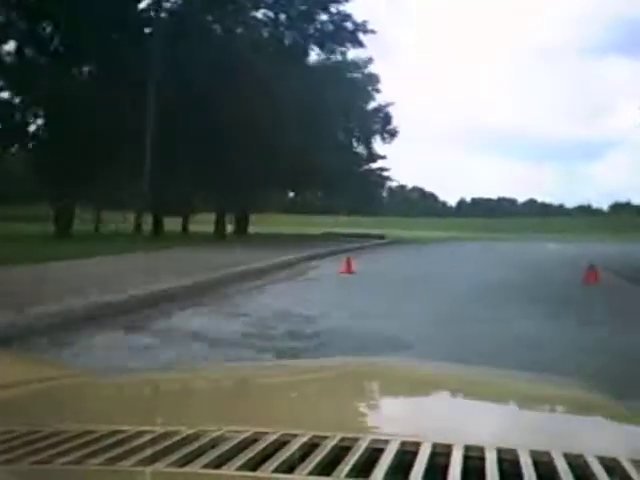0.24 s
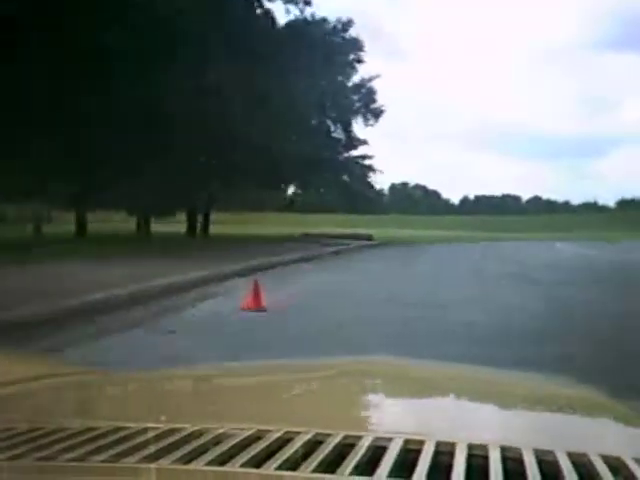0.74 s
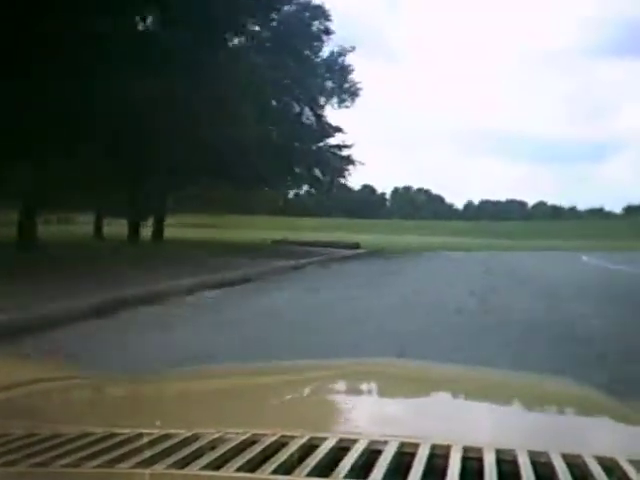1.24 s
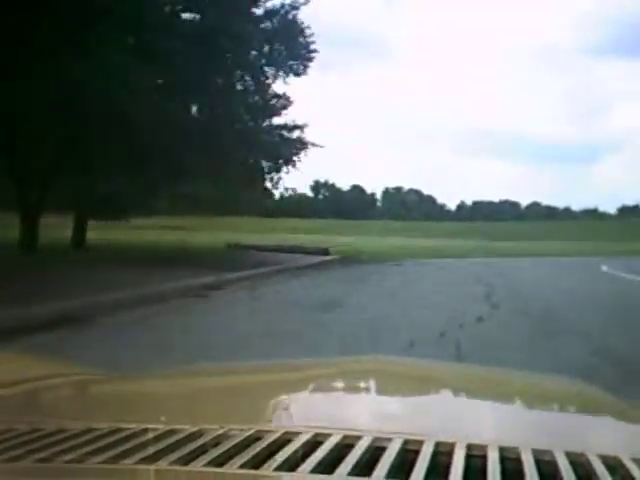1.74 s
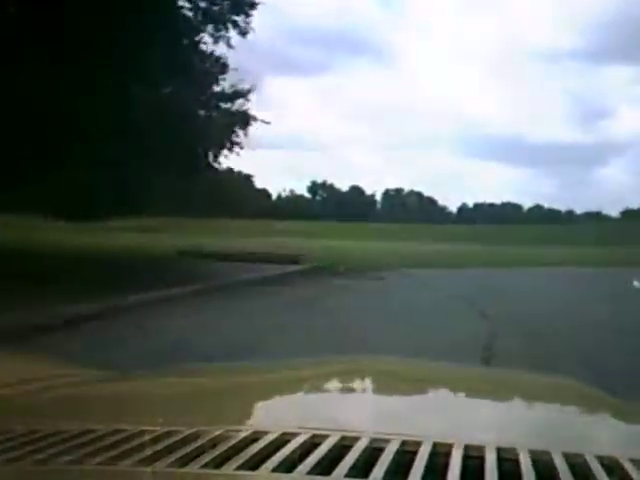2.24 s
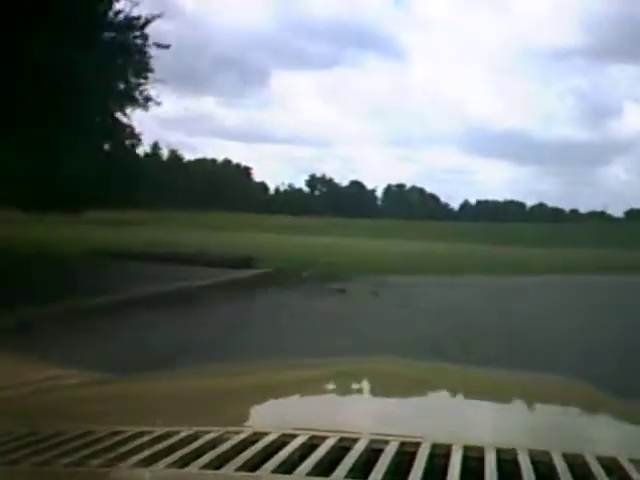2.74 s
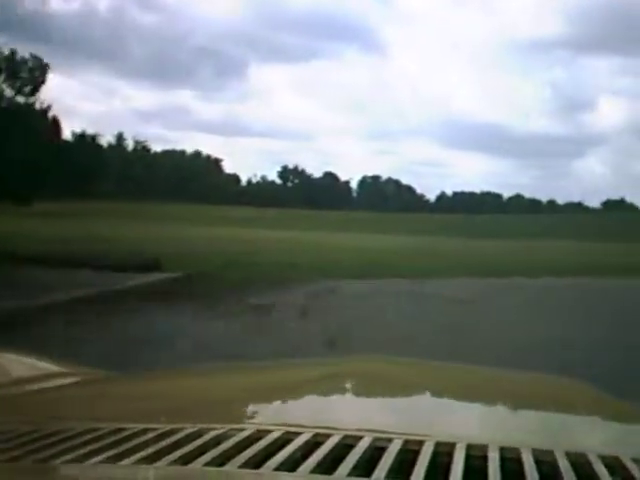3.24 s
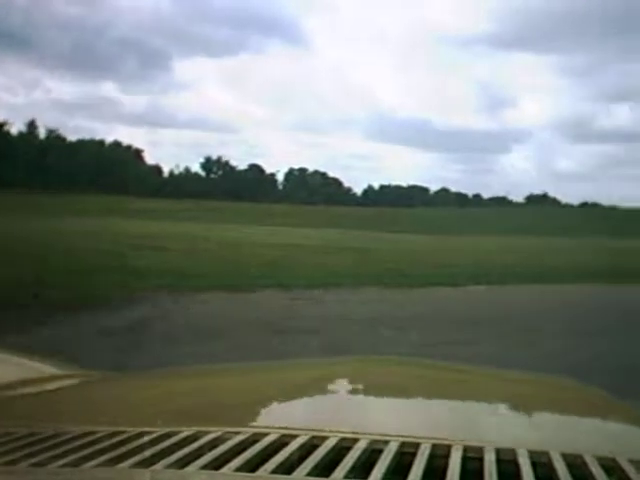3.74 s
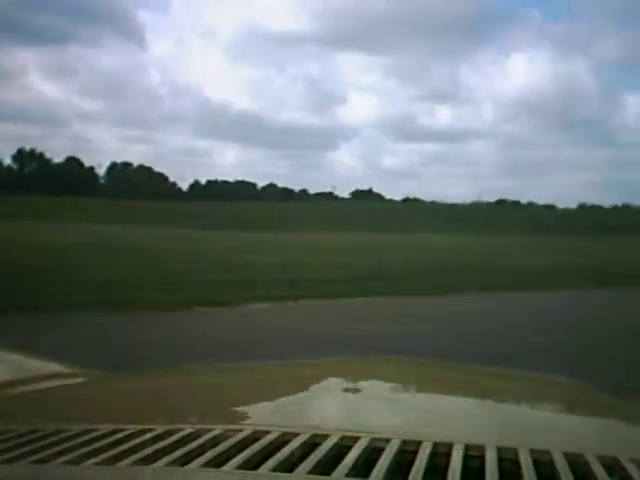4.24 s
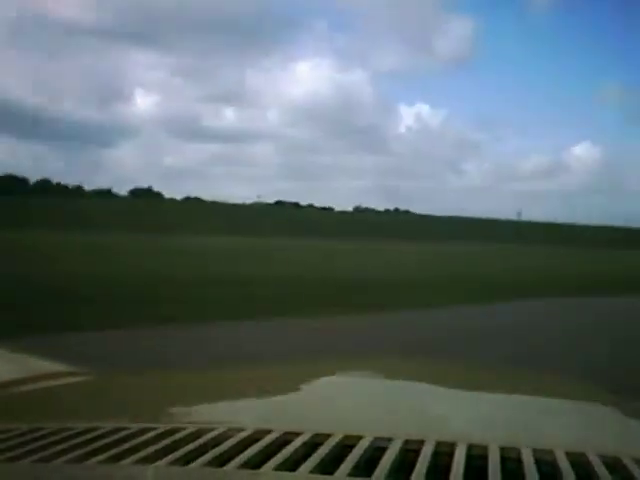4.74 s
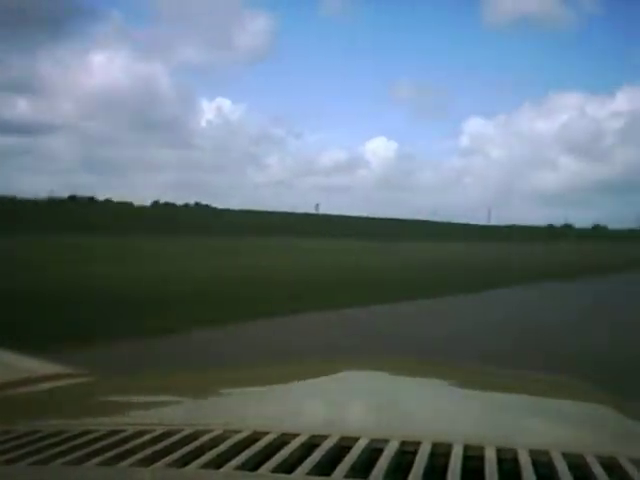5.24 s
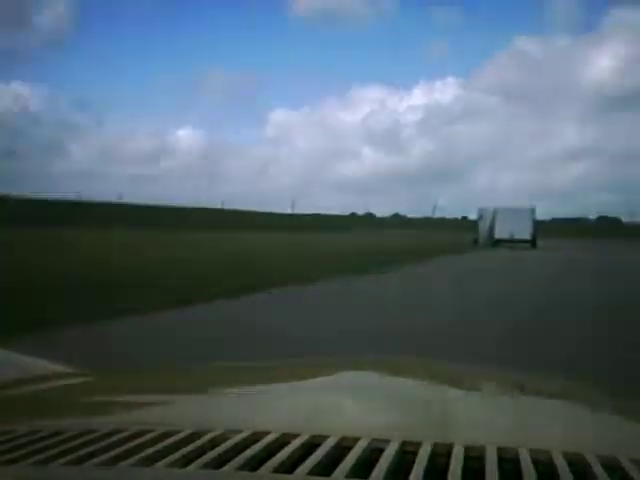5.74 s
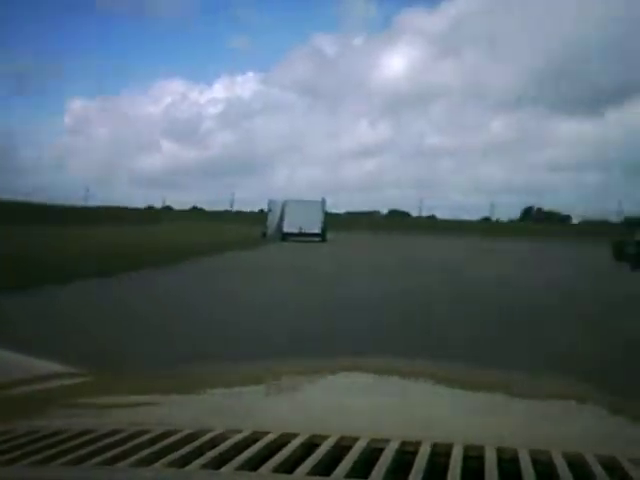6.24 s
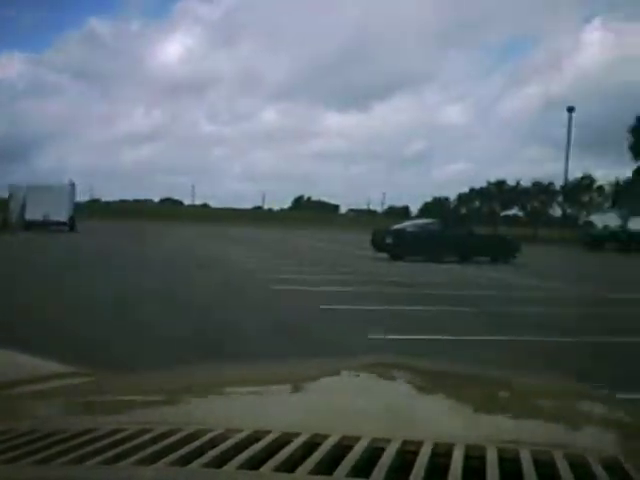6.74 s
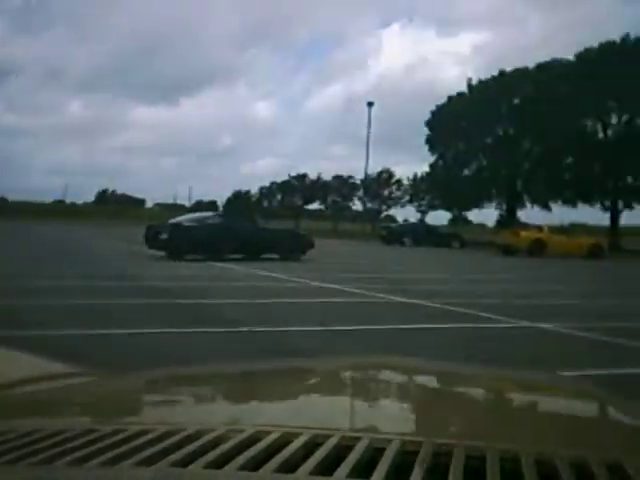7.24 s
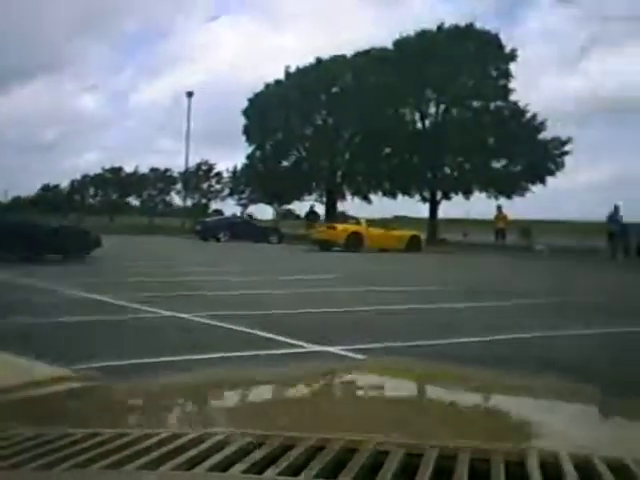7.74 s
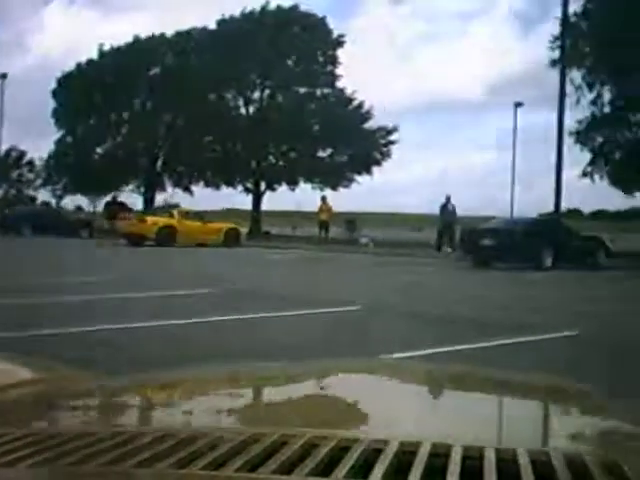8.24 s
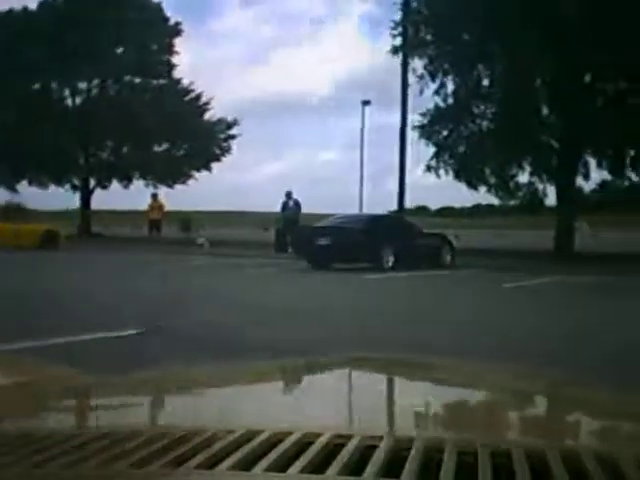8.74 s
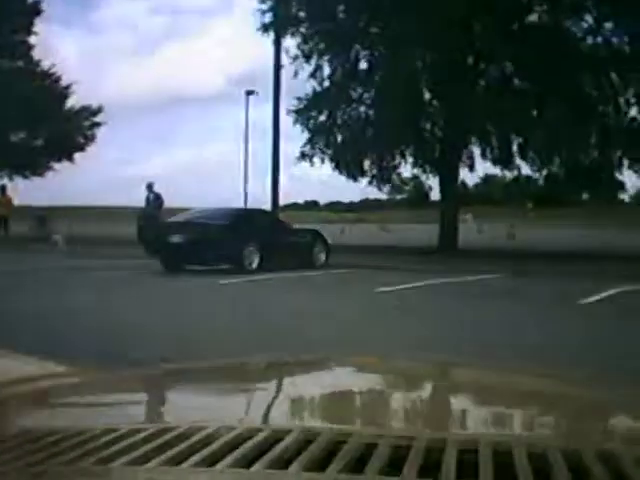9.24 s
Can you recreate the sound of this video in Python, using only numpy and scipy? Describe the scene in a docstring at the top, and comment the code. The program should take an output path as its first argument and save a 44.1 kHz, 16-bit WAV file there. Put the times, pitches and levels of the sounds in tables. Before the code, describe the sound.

A car coasts to a slow roll with cabin boom, tyre hiss and falling whine, then loud handling knocks, squeaks and dropouts hit the microphone.

```python
"""Car coasting to a slow roll, heard from the dashboard

A car coasts down across a tarmac lot, heard by a small camera on the dashboard. Cabin boom, tyre roar and
grit hiss are noise in resonances; the gear whine is a falling tone, the brake drag a band of hiss.
Jolts are dying swings; ticks, knocks and rubs ring the camera case. Near the end a hand knocks and
rubs the case, and the pressure pins the microphone at its limits, so the sound drops out and pops."""
import sys
import numpy as np
from scipy import signal
from scipy.io import wavfile
from scipy.ndimage import uniform_filter1d

SR = 44100
rng = np.random.default_rng(int(sys.argv[2]) if len(sys.argv) > 2 else 0)


def invert_db(x):
    """Field ratio 10**(x/20) for x, a level in decibels (scalar or array-like)."""
    u = np.asarray(x, float) / 20
    return 10 ** u


def file_out(sig):
    """Save sig as 16-bit WAV at sys.argv[1]."""
    # one column per channel
    cols = np.atleast_2d(sig).T
    # limit, then scale
    lim = np.clip(cols, -1, 1)
    pcm = np.round(lim * 32767).astype(np.int16)
    wavfile.write(sys.argv[1], SR, pcm)


N = 418499  # length in samples

# The car slowing down. Each row: time in seconds, cabin boom in dB, tyre roar in dB.
SLOWING_CAR = [(0.0, -6, -30.5), (0.13, -13.5, -33.5), (0.24, -23, -33.5), (0.42, -19, -35.5),
               (0.74, -18.5, -34.5), (1.0, -15.5, -32.5), (1.3, -18.5, -36), (1.74, -20.5, -37),
               (2.0, -21.5, -34.5), (2.5, -21, -38.5), (3.38, -21.5, -36), (4.07, -20.5, -39.5),
               (4.7, -24.5, -39), (5.1, -22.5, -40.5), (6.9, -22.5, -42.5), (7.3, -24, -42),
               (8.3, -24, -42.5), (9.49, -26, -44)]


def curve(table):
    """Draws straight lines between the rows of a time table, giving each column one value a sample."""
    seconds, *columns = np.transpose(table)
    return [np.interp(np.arange(N) / SR, seconds, column) for column in columns]


def set_rms(x, db):
    """Scales a sound to an average (rms) level in dB."""
    return x * invert_db(db) / np.sqrt(np.mean(x ** 2))


def walk(rate):
    """Wanders at random: levels held for 1 / rate seconds, then smoothed twice; spread near 1."""
    hold = int(SR / rate)
    steps = np.repeat(rng.standard_normal(N // hold + 1), hold)
    smooth = uniform_filter1d(uniform_filter1d(steps, hold), hold)
    return 1.42 * smooth[:N]


def resonances(table, flicker_db, flicker_rate):
    """Noise through steep resonances, each flickering on its own; the sum is set to 0 dB rms."""
    out = 0
    for hz, width, db in table:
        b, a = signal.iirpeak(hz, hz / width / 1.34, fs=SR)
        # filtering twice makes the sides steeper
        once = signal.lfilter(b, a, rng.standard_normal(N))
        band = signal.lfilter(b, a, once)
        out = out + set_rms(band, db) * invert_db(flicker_db * walk(flicker_rate))
    return set_rms(out, 0)


def case(low_push, push, bright_push):
    """The case rings in dying tones, in three groups for where and how sharply the contact lands."""
    # Ringing tones of the camera case. Each row: pitch in Hz, strength in dB,
    # time to die by 60 dB in seconds.
    modes = [(320, -14, 0.056), (540, -22.5, 0.017), (876, -8.5, .05), (987, -5, .05), (1130, -8, 0.041),
             (1227, -2.5, 0.04), (1352, 2.5, 0.022), (1680, -8.5, 0.017), (2000, -16, 0.018),
             (2408, -11, 0.014), (3074, -11.5, 0.0099), (3218, -9.5, 0.018), (3510, -16, 0.019)]
    out = 0
    for hz, db, t60 in modes:
        radius = np.exp(-np.log(1000) / (t60 * SR))
        angle = 2 * np.pi * hz / SR
        if hz < 1020:
            x = low_push
        elif hz < 1800:
            x = push
        else:
            x = bright_push
        b = [0, radius * np.sin(angle)]
        a = [1, -2 * radius * np.cos(angle), radius * radius]
        out = out + invert_db(db) * signal.lfilter(b, a, x)
    return out


def crack(push, db):
    """The contact heard directly: mostly its sharp edges, above about 1 kHz."""
    edges_only = signal.butter(2, 1100., "high", fs=SR, output="sos")
    return invert_db(db) * signal.sosfilt(edges_only, push)


def drive():
    """Boom, roar and hiss are noise in resonances; bumps in the tarmac shake all three together."""
    # Cabin resonances. Each row: centre in Hz, rough width in Hz, relative level in dB.
    cabin = [(32, 14, -5.5), (55, 14, -4), (84.25, 18, 1), (126.4, 37.2, -5.5), (161.2, 38.8, -7),
             (187.9, 32, -6.5), (260, 37, -16.5)]
    # Tyre roar as the case colours it. Each row: centre in Hz, rough width in Hz, relative level in dB.
    tyre_roar = [(542, 160, -5), (786.5, 116, 0), (1054, 180, -3.5), (1272, 110, -4), (1610, 240, -11)]
    # Grit hiss as the case colours it. Each row: centre in Hz, rough width in Hz, relative level in dB.
    grit_hiss = [(2346, 390, -2.5), (3199, 446, 2.5), (3460, 150, -14.5), (4560, 250, 1.5)]
    grit_under_roar_db = 0.5
    boom_db, roar_db = curve(SLOWING_CAR)
    bumps = walk(19)
    boom = resonances(cabin, 0.9, 13) * invert_db(boom_db + 1.1 * bumps)
    roar = resonances(tyre_roar, 0.86, 30) * invert_db(roar_db + 1.3 * bumps)
    grit_db = roar_db - grit_under_roar_db + 0.52 * bumps + 1.0 * walk(4)
    grit = resonances(grit_hiss, 1.9, 60) * invert_db(grit_db)
    return boom + roar + grit


def rattle(per_s, db):
    """Trim and grit tick faintly against the body, most ticks tiny and a few clear."""
    happens = rng.random(N) < per_s / SR
    size = invert_db(4.0 * rng.exponential(size=N).clip(0, 3.5))
    ticks = happens * size * rng.choice([-1, 1], N)
    # the ticks follow the tyre roar
    ticks = ticks * invert_db(db + curve(SLOWING_CAR)[1])
    return case(ticks, ticks, invert_db(10.5) * ticks) + crack(ticks, 20)


def whine():
    """Gear teeth meshing slower as the car slows; the tone wavers, comes in strokes and fades out."""
    # The gear whine. Each row: time in seconds, pitch in Hz, level in dB before the flicker.
    pitch_track = [(0.05, 3350, -46), (.5, 3310, -40), (.77, 3225, -39), (1, 3090, -42), (1.25, 2930, -47),
                   (1.52, 2790, -50), (1.7, 2700, -59), (2.45, 2345, -58), (2.62, 2200, -50),
                   (2.75, 2050, -62)]
    flicker_db, flicker_per_s = 5, 17
    hz, db = curve(pitch_track)
    # fades over the last 0.1 s before the final row
    fade = np.clip((pitch_track[-1][0] - np.arange(N) / SR) / .1, 0, 1)
    waver = 1 + .005 * walk(14) + .008 * walk(120)
    tone = np.sin(2 * np.pi * np.cumsum(hz * waver) / SR)
    return np.sqrt(2) * tone * fade * invert_db(db + flicker_db * walk(flicker_per_s))


def brake():
    """Brake pads drag in a short bright hiss with narrow streaks: quick to bite, slower to let go."""
    # Hiss of the pads. Each row: centre in Hz, rough width in Hz, relative level in dB.
    pads = [(2656, 35, -6.5), (2870, 390, -8.5), (3073, 38, 0.5), (3200, 65, 0.5), (3520, 190, 2),
            (3610, 42, -9.5), (3740, 64, -2), (4250, 210, 1)]
    on_s, attack_s, off_s = 1.684, 0.075, 2.14
    level_db, fade_db_per_s = -32.5, 71.5
    t = np.arange(N) / SR
    bite = ((t - on_s) / attack_s).clip(0, 1) ** 2
    letting_go_db = fade_db_per_s * (t - off_s).clip(0)
    return resonances(pads, 2, 30) * bite * invert_db(level_db - letting_go_db)


def jolts():
    """The camera rocks on its mount: each jolt is a swing that dies away quickly."""
    # Jolts through the mount. Each row: start in seconds, swing rate in Hz, signed swing size,
    # time to die by 60 dB in seconds.
    swings = [(0.007, 71, 0.77, 0.07), (0.045, 79, 1, .1), (0.065, 76, 1, 0.089), (0.815, 73, -0.59, .12),
              (0.884, 60.5, -0.45, 0.084), (1.097, 91.4, 0.63, 0.21), (2.345, 260, .15, 0.055),
              (7.105, 98, 1, 0.18), (7.133, 89.4, -0.81, 0.27), (7.424, 85, 0.74, .06),
              (7.6, 108.5, 0.54, .06), (7.724, 154, 0.41, .04), (7.873, 115, -0.47, 0.11),
              (7.885, 108, -1.12, 0.035), (8.041, 139, -1.14, 0.12), (8.039, 284, -0.73, .12),
              (8.052, 394, 0.86, 0.035), (8.02, 60.2, -0.29, .05), (8.472, 45, 0.63, 0.078),
              (8.381, 173, 0.39, 0.048), (8.102, 130, 0.76, 0.058), (8.13, 70.4, -0.49, 0.087),
              (8.265, 127.6, 0.34, 0.033), (8.309, 225, 1, 0.017), (8.633, 101, -0.72, 0.026),
              (8.733, 139, -0.82, .05), (9.311, 300, 1, 0.0044)]
    t = np.arange(SR // 2) / SR
    out = np.zeros(N + SR // 2)
    for start, hz, size, t60 in swings:
        i = int(start * SR)
        dying = np.exp(-np.log(1000) * t / t60)
        out[i:i + len(t)] += size * np.sin(2 * np.pi * hz * t) * dying
    return out[:N]


def knocks():
    """Each knock is one sharp blow and a few ms of rattling contact; it rings the case and cracks."""
    # Knocks on the case. Each row: start in seconds, push in dB, push on the low tones
    # and push on the treble tones, both in dB against the main push.
    blows = [(0.016, -45.5, -6, -8), (0.058, -53, 2.5, -5), (0.222, -65, 0, 6), (0.724, -62, 4, 11),
             (0.785, -59, 0, 6.5), (0.796, -55, 5, 8), (0.833, -60.5, -.5, 1), (1.098, -60, 6, -2),
             (2.338, -50, -3, 10), (2.342, -52.5, 2, 8), (2.348, -53, 7.5, 13), (2.717, -60, 1, -4),
             (2.968, -63.5, 10, 10), (3.234, -56.5, 6, 4), (4.068, -57, -2, 12), (4.329, -69, 2, 17.5),
             (6.19, -65, -10, 10), (6.595, -65, 11.5, 11.5), (6.724, -70, 10, 11.5), (7.101, -52, 5, 15.5),
             (7.105, -38.5, -13.5, 3.5), (7.112, -40.5, 8.5, 7), (7.314, -59, -2, 13.5),
             (7.451, -47, -1, -10), (7.525, -38, -14, 0.5), (7.567, -49, -9.5, -6), (7.582, -47.5, -2, -13),
             (7.598, -46, -8, 5.5), (7.702, -48.5, -9, -1.5), (7.779, -48.5, -7, -5), (7.831, -51, -10, 16),
             (7.876, -40, -2, 4.5), (8.039, -35.5, -6, -5), (8.153, -44, -2.5, -9), (8.266, -62.5, 4, 8),
             (8.374, -63, 11, 8), (8.643, -47.5, 5.5, -18), (8.686, -39, -5.5, 10), (8.786, -53.5, -14, 11),
             (8.876, -58, -10.5, -3.5), (9, -58, -4, -13), (9.109, -37, 0, 8.5), (9.164, -62.5, -3, 12),
             (9.269, -67, 10, 14.5)]
    contact_ms = 1.8
    first_blow = 10  # against the starting strength of the rattle after it
    t_ms = np.arange(900) / SR * 1000
    push = np.zeros((3, N + len(t_ms)))  # low, main and treble
    for start, db, low_db, treble_db in blows:
        burst = rng.standard_normal(len(t_ms)) * np.exp(-t_ms / contact_ms)
        burst[0] = first_blow
        i = int(start * SR)
        shares = invert_db(np.array([[low_db], [0], [treble_db]]))
        push[:, i:i + len(t_ms)] += shares * set_rms(burst, db)
    push = push[:, :N]
    return case(*push) + crack(push[2], 22)


def rubs():
    """Skin sticks and slips: uneven clicks in clumps, and a wavering squeak that sinks as the finger slows."""
    # Fingers rubbing the case. Each row: start in seconds, end in seconds, push in dB at the start,
    # push in dB at the end, squeak in dB.
    strokes = [(7.126, 7.162, -39.5, -45, -52.5), (7.314, 7.342, -33.5, -38.5, -43),
               (7.346, 7.368, -21, -27, -4), (7.37, 7.421, -27, -22, -4.5),
               (7.419, 7.431, -24, -23.5, -7.5), (7.434, 7.474, -35.5, -33.5, -16.5),
               (7.484, 7.512, -42.5, -32.5, -21.5), (7.5252, 7.537, -21.5, -33, -6),
               (7.555, 7.594, -42.5, -34.5, -16.5), (7.603, 7.642, -29, -32, -25.5),
               (7.65, 7.686, -41, -55.5, -36.5), (7.721, 7.751, -32, -26.5, -17),
               (7.829, 7.883, -35.5, -42, -30), (7.884, 7.918, -31, -24.5, -16.5),
               (7.945, 7.974, -36, -63, -44), (8.04, 8.078, -29.5, -39, -35),
               (8.406, 8.437, -43, -46.5, -32), (8.456, 8.481, -50, -39.5, -48)]
    # The hand rests on the case and brushes it lightly: start in seconds, end in seconds, push in dB.
    brush_start, brush_end, brush_db = (7.43, 8.43, -49)
    brush_fade_db_per_s = 7.5
    # the squeak sinks from rub to rub, and within each rub by the glide (a fraction either side)
    squeak_hz, squeak_from_s, sink_hz_per_s, glide = 1291, 7.35, 170, 0.02
    # the louder the squeak against the push, the duller the slips
    slip_treble_db, dulling = 10, .45
    t = np.arange(N) / SR
    clumps = invert_db(2.8 * walk(160).clip(-2.5, 1.6))
    slips = rng.standard_normal(N) * (rng.random(N) < .12) * clumps
    waver = 1 + .018 * walk(50) + .04 * walk(400)
    throb = invert_db(2.2 * walk(220))
    brushing = (t > brush_start) & (t < brush_end)
    push = slips * brushing * invert_db(brush_db - brush_fade_db_per_s * (t - brush_start).clip(0))
    bright = push * invert_db(-5.0)
    squeak = np.zeros(N)
    for start, end, db, end_db, squeak_db in strokes:
        i, j = int(start * SR), int(end * SR)
        rub = slips[i:j] * invert_db(np.linspace(db, end_db, j - i))
        push[i:j] += rub
        squeak_over_push = squeak_db - (db + end_db) / 2
        bright[i:j] += rub * invert_db(slip_treble_db - dulling * squeak_over_push)
        middle_hz = squeak_hz - sink_hz_per_s * (start - squeak_from_s)
        hz = middle_hz * np.linspace(1 + glide, 1 - glide, j - i)
        tone = np.sin(2 * np.pi * np.cumsum(hz * waver[i:j]) / SR)
        soft_ends = signal.windows.tukey(j - i, .12)
        squeak[i:j] += invert_db(squeak_db) * soft_ends * throb[i:j] * tone
    return case(invert_db(-3.5) * push, push, bright) + squeak + crack(bright, 17.2)


def scene():
    """Everything adds up at one microphone inside the case."""
    background = drive() + rattle(per_s=32.0, db=-6.5)
    car = whine() + brake() + jolts()
    hand = knocks() + rubs()
    return (background + car + hand)[None]


def pin(x, swing_s):
    """While pinned the microphone passes nothing and the coupling capacitor drains the last value."""
    # Times at the limit. Each row: pinned from in seconds, free again in seconds,
    # signed output value on arrival.
    stuck = [(0.0015, 0.0074, -1.28), (0.024, 0.0283, -0.66), (0.0312, 0.0366, 0.67),
             (0.0384, 0.0438, -1.1), (7.1201, 7.1257, -1.21), (7.1271, 7.1326, 1.23),
             (7.9297, 7.9405, -0.04), (7.9482, 7.9539, -0.08), (7.9902, 7.9951, 0.05),
             (7.9976, 8.0186, 0.05), (8.083, 8.1032, -0.16), (8.1074, 8.1168, -0.21),
             (8.1686, 8.1863, 0.03), (8.2235, 8.2296, 0.12), (8.2343, 8.2463, 0.07),
             (8.3112, 8.3146, -0.38), (8.329, 8.3594, -0.14), (8.4345, 8.4691, -0.45),
             (8.4813, 8.5432, 0.2), (8.5439, 8.5938, -1.38), (8.5944, 8.6322, 1.4), (8.6739, 8.6785, -0.13),
             (8.6893, 8.7029, -0.19), (8.7034, 8.7337, 1.37), (8.7381, 8.7758, 0.27),
             (8.8867, 8.8954, -0.3), (8.9786, 8.9875, -0.14), (8.9892, 8.9966, -0.0)]
    coupling_s = .00196  # time constant of the drain
    out = x.copy()
    drain = np.exp(-np.arange(SR // 10) / SR / coupling_s)
    free = 0
    for start, end, arrival in stuck:
        i, j = int(start * SR), int(end * SR)
        k = max(free, i - int(swing_s * SR))
        # the swing that carries it to the limit
        out[k:i] += (arrival - out[i]) * np.linspace(0, 1, i - k)
        # on release the sound starts again from the drained value
        out[j:j + len(drain)] += (arrival * drain[j - i] - out[j]) * drain
        out[i:j] = arrival * drain[:j - i]
        free = j
    return out


def low_pass(x):
    """Removes everything above the highest recorded frequency."""
    return signal.sosfilt(signal.butter(12, 15800, fs=SR, output="sos"), x)


def record(dry):
    """Little below 25 Hz, the pinned microphone, a converter that clips and keeps 4 kHz; its ringing clips too."""
    converter_top, final_top = 0.71, .712  # clipping limits, full scale is 1
    low_cut = signal.butter(2, 24., "high", fs=SR, output="sos")
    x = pin(signal.sosfilt(low_cut, dry[0]), swing_s=0.0037)
    x = signal.sosfilt(signal.butter(2, 3800., fs=SR, output="sos"), x)
    x = np.clip(x, -converter_top, converter_top)
    steep_low_pass = signal.firwin(201, 4050., window=("kaiser", 9.), fs=SR)
    x = signal.fftconvolve(x, steep_low_pass, "same")
    return low_pass(np.clip(x, -final_top, final_top)[None])


dry = scene()
out = record(dry)
file_out(out)
```